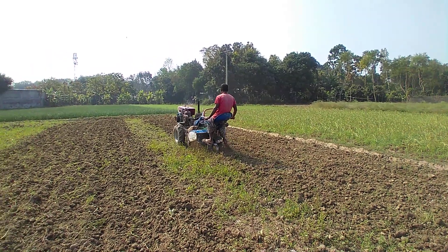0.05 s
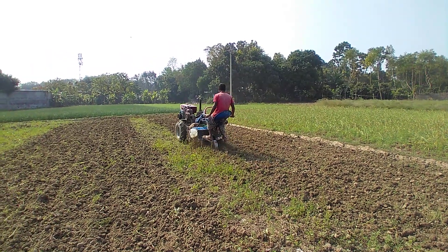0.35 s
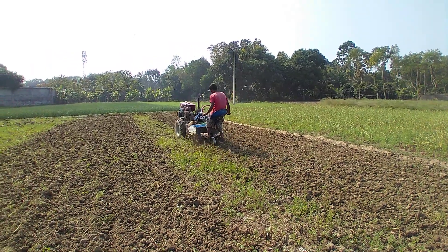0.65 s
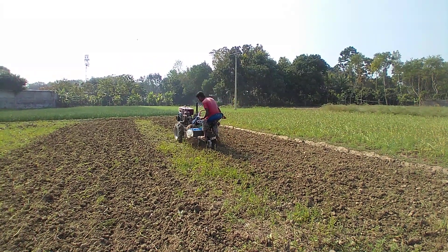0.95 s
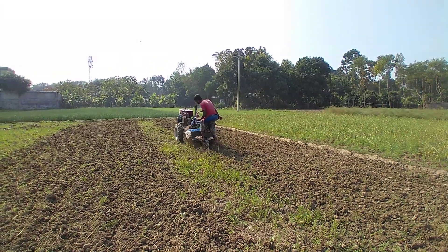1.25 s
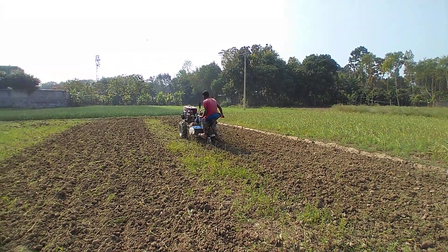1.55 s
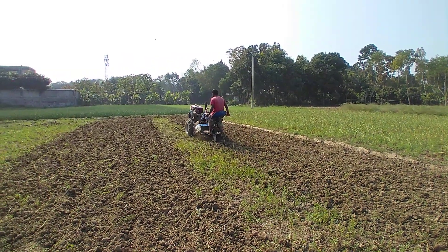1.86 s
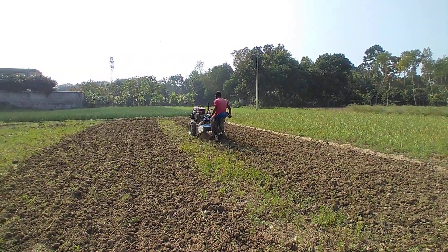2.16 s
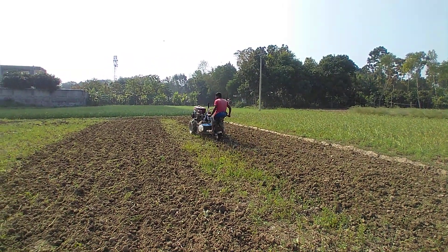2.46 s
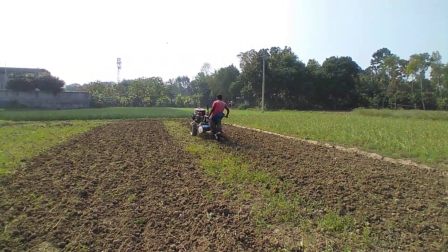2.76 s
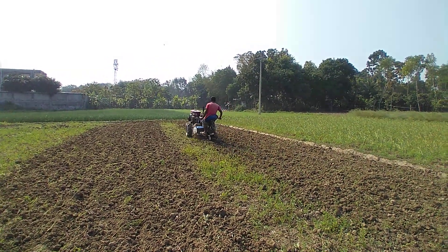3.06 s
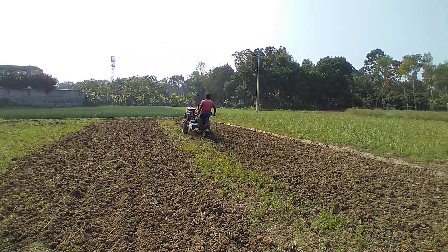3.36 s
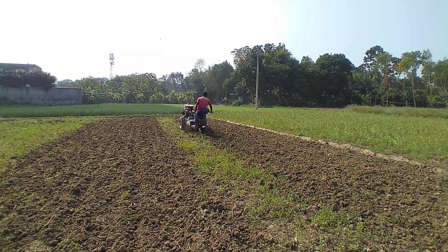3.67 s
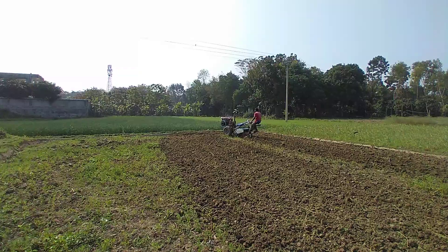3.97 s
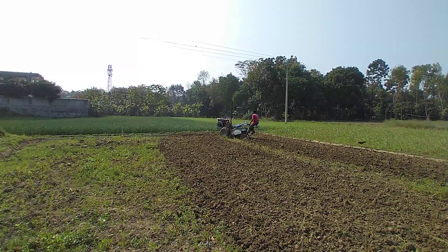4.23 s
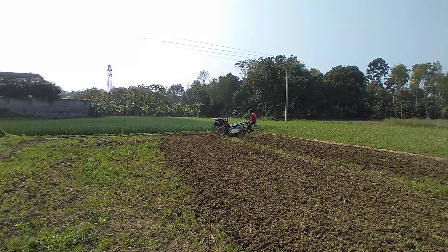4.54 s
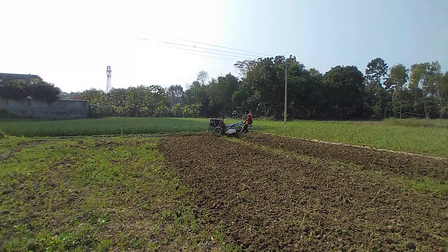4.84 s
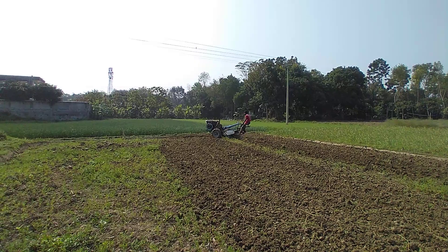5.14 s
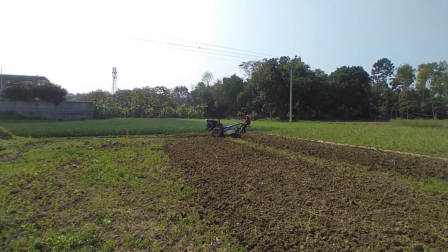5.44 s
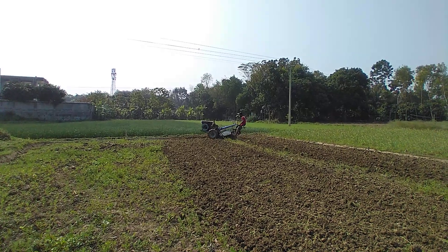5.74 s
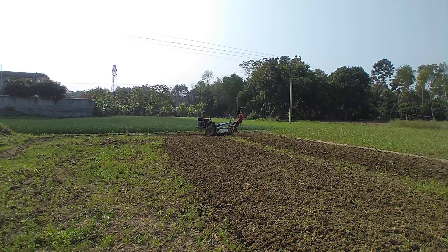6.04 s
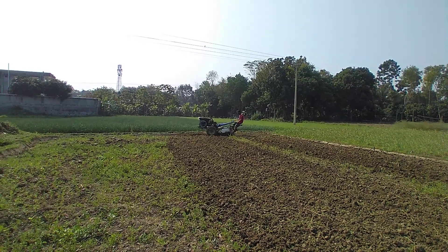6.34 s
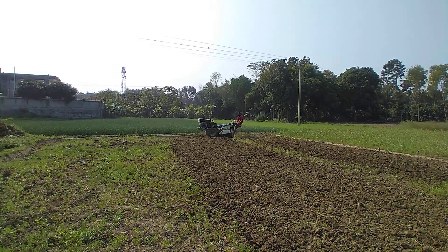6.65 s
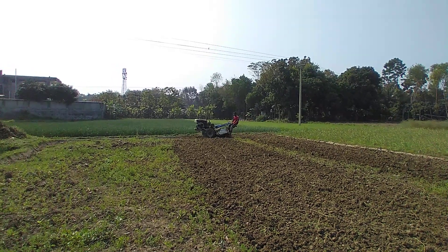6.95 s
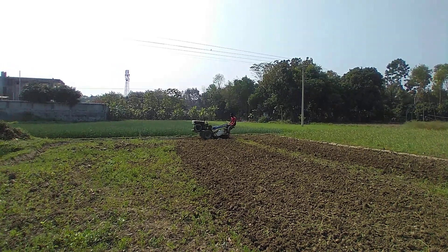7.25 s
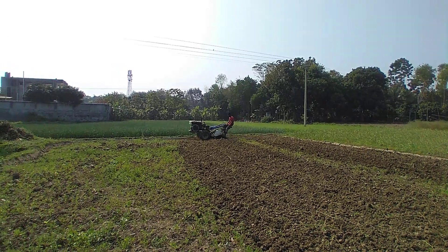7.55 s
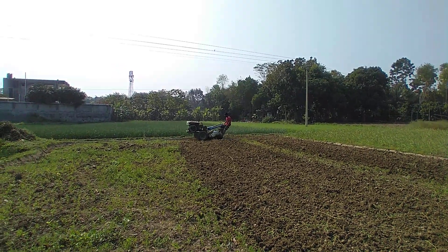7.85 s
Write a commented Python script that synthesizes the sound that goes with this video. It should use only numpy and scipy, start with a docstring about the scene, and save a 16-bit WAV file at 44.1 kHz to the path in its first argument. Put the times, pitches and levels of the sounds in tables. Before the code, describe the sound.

A single-cylinder diesel power tiller runs throughout in an open field, several metres from a stereo microphone. It fires evenly, about ten times a second, each low exhaust thump carrying a brief hissing whistle, over metallic engine knock and the chatter of gears and tines. For the first few seconds it grows slightly fainter and duller as it drives away. Wind rumbles on the microphone in gusts from about 0.4 to 1.3 seconds and again from 2.8 to 3.8. A faint, high clink of a tine comes at about 3.1 seconds and another at 5.1. At 3.8 seconds the engine's tone changes abruptly as it is heard from the side, and it continues at a steady distance, speeding up very slightly after 6 seconds. From about 7 seconds the strongest gust buffets the microphone, mostly on the right, easing by 8 seconds as the engine keeps chugging.

```python
"""An open field, a stereo microphone in a gusty breeze. At first a single-cylinder diesel power tiller is
heard from behind, 7.6 m off and driving away: each firing thumps through the silencer with a whistling
jet of gas, while combustion and valves knock the block over the chatter of gears and tines. At 3.1 s a
tine clinks in the soil. At 3.82 s the view jumps to the tiller's side, where it turns at a steady
distance. Near 7.2 s the strongest gust buffets the microphone, mostly its right port."""
import sys
import numpy as np
from scipy import signal
from scipy.fft import rfft, irfft
from scipy.io import wavfile
from scipy.ndimage import uniform_filter1d

SR = 44100
rng = np.random.default_rng(int(sys.argv[2]) if len(sys.argv) > 2 else 0)


def generate_wav(signal):
    """Clip the signal to [-1, 1] and save it as 16-bit WAV at the path in sys.argv[1]."""
    frames = np.transpose(np.atleast_2d(signal))
    scaled = np.clip(frames, -1, 1) * 32767
    pcm = np.round(scaled).astype(np.int16)
    wavfile.write(sys.argv[1], SR, pcm)


N = 357210
TIME = np.arange(N) / SR


def undb(db):
    """Decibels to gain."""
    return 10 ** (np.asarray(db) / 20)


def curve(table):
    """A table's (time, value) points joined by straight lines."""
    return np.interp(TIME, *np.transpose(table))


def butter(x, hz, kind, order=2):
    """Plain low-, high- or band-pass."""
    sos = signal.butter(order, np.clip(hz, 5, .45 * SR), kind, fs=SR, output="sos")
    return signal.sosfilt(sos, x + 1e-18)


def shelf(x, hz, low_db, high_db):
    """Separate gains below and above a frequency."""
    low = signal.sosfiltfilt(signal.butter(2, hz, fs=SR, output="sos"), x)
    return low * undb(low_db) + (x - low) * undb(high_db)


def walk(rate_hz):
    """Smooth random wander with a spread near 1."""
    step = int(SR / rate_hz)
    return 1.46 * uniform_filter1d(np.repeat(rng.standard_normal(N // step + 1), step), step)[:N]


def strike(times, sizes, response):
    """One scaled copy of a response at each time."""
    train = np.zeros(N)
    heard = (times >= 0) & (times < TIME[-1])
    np.add.at(train, (times[heard] * SR).astype(int), sizes[heard])
    return signal.oaconvolve(train, response)[:N]


def scatter(times, spread_db):
    """Random gains: no two firings are equally strong."""
    return undb(spread_db * rng.standard_normal(len(times)))


def turbulence(spread_hz=4200, own_db=3.0):
    """Noise at the microphone's two ports: alike in the bass, partly unrelated in the treble."""
    own = butter(rng.standard_normal((2, N)), spread_hz, "high", order=1)
    return rng.standard_normal(N) + undb(own_db) * own


# gusts crossing the field to the microphone (time [s], hold [s], relative level [dB])
FIELD_GUSTS = [(0.36, .04, -18.5), (0.538, .07, -14.5), (0.88, 0.15, -11), (1.202, 0.031, -13),
               (1.45, 0.31, -20.5), (2.76, 0.028, -15.5), (2.963, 0.083, -13.5), (3.233, 0.16, -11.5),
               (3.606, 0.17, -14.5), (5.045, .03, -23.5), (6.919, 0.085, -13.5), (7.2, .32, -9),
               (7.598, 0.4, -17)]

def wind_strength(attack_s=.052, release_s=.13, breeze_db=-29, wander_db=2.0):
    """Wind level in dB: each gust builds, holds and dies away over a light wandering breeze."""
    power = undb(breeze_db + wander_db * walk(4)) ** 2
    for start_s, hold_s, db in FIELD_GUSTS:
        before = np.maximum(start_s - TIME, 0) / attack_s
        after = np.maximum(TIME - start_s - hold_s, 0) / release_s
        power += undb(db) ** 2 * np.exp(-2 * np.minimum(before + after, 20))
    return 10 * np.log10(power)


# wind rumble right on the microphone (frequency [Hz], relative level [dB])
RUMBLE_SPECTRUM = [(6, -27), (20, 6), (65, -1), (105, -8), (165, -13), (230, -23.5), (330, -29),
                   (480, -36.5), (1000, -43), (16000, -115)]

def wind(gain_db=2.0, left_db=-14, eddy_db=3.1, bluster=.6, usual_db=-16):
    """Eddies rumble on each port separately, brighter in strong gusts; the left port is sheltered."""
    hz, db = np.transpose(RUMBLE_SPECTRUM)
    gust_db = wind_strength()
    colour = undb(np.interp(np.log(np.fft.rfftfreq(N, 1 / SR) + 1), np.log(hz), db))
    ports = np.array([irfft(rfft(rng.standard_normal(N)) * colour, N) * undb(eddy_db * walk(30))
                      for _ in range(2)])
    ports = shelf(ports / ports.std(), 130, 0, bluster * (gust_db - usual_db))
    return ports * undb(gust_db + gain_db + np.array([[left_db], [0]]))


# eddies that slap the microphone's right port (time [s], level [dB])
EDDY_SLAPS = [(3.27, -27), (3.62, -24), (7.194, -12.5), (7.23, -23), (7.41, -15), (7.598, -20.5)]

def buffets(swell_s=.0063, band_hz=(110, 330)):
    """Each eddy bursts on the right port with a short, rough flap."""
    times, db = np.transpose(EDDY_SLAPS)
    age = TIME[:SR // 6] / swell_s
    flap = butter(rng.standard_normal(N), band_hz, "band")
    bursts = strike(times, undb(db), age * np.exp(1 - age))
    return np.array([np.zeros(N), flap / flap.std() * bursts])


# tines hitting something hard in the soil, heard dead centre (time [s], pitch [Hz], level [dB])
TINE_HITS = [(3.125, 7200, -34), (5.103, 7550, -33)]

def clinks(t60_s=.071, beat_hz=170):
    """A struck tine rings briefly with a close pair of modes."""
    age = TIME[:SR // 8]
    envelope = 1000 ** (-age / t60_s) * (1 - np.exp(-age * 1000))
    out = 0
    for hit_s, hz, db in TINE_HITS:
        modes = np.sin(2 * np.pi * hz * age) + .5 * np.sin(2 * np.pi * (hz - beat_hz) * age)
        out = out + strike(np.array([hit_s]), undb([db]), envelope * modes)
    return out


# governed engine speed, from behind and from the side (time [s], firing rate [Hz])
REAR_SPEED = [(0.0, 10.454), (0.46, 10.562), (1.48, 10.417), (2.65, 10.465), (3.82, 10.58)]
SIDE_SPEED = [(3.82, 10.382), (4.5, 10.495), (4.71, 10.256), (5.76, 10.462), (5.97, 10.672), (7.24, 10.95),
              (8.1, 10.752)]

def firings(rate_hz, start_s):
    """Times of blowdown, one of them at start_s: the exhaust opens once in two turns of the crank."""
    cycles = np.cumsum(rate_hz) / SR
    cycles -= np.interp(start_s, TIME, cycles)
    return np.interp(np.arange(np.ceil(cycles[0]), cycles[-1]), cycles, TIME)


def chatter(fired, rattle_db, tines_db, contacts=60, slip_s=.0002466):
    """Gear teeth tick near the same crank angles in every cycle; chain and tines clatter at random."""
    cycle = np.arange(len(fired))
    times = np.interp(cycle[:, None] + rng.random(contacts), cycle, fired, right=-1)
    # backlash lets each contact creep from cycle to cycle
    times += slip_s * np.cumsum(rng.standard_normal(times.shape), axis=0)
    sizes = rng.choice([-1, 1], contacts) * undb(3.3 * rng.standard_normal(times.shape))
    teeth = butter(strike(times.ravel(), sizes.ravel(), np.ones(1)), 1380, "low")
    tines = turbulence() * undb(1.02 * walk(220) + .45 * walk(14))
    return undb(rattle_db) * teeth + undb(tines_db) * tines


# combustion knock, piston slap, valves lifting and seating, from behind and from the side
# (time after blowdown [ms], centre [Hz], width [Hz], relative level [dB])
REAR_IMPACTS = [(-15, 1220, 260, 30), (-9, 830, 150, 34.5), (4.5, 640, 300, 26.5), (32.5, 630, 360, 31),
                (59, 600, 120, 24.5)]
SIDE_IMPACTS = [(-18, 1380, 107, 35.8), (-14.5, 785, 130, 34.5), (2.5, 1510, 860, 29.2),
                (28, 1170, 260, 30.3), (32, 647, 220, 32.8), (60.5, 770, 180, 17)]

def knocks(fired, impacts, spread_db=2.3, play_s=.00008):
    """Metal meets metal at set points of the cycle; softer contacts sound lower."""
    out = 0
    for delay_ms, hz, width_hz, db in impacts:
        contact = butter(signal.unit_impulse(1024), [hz - width_hz / 2, hz + width_hz / 2], "band", 1)
        times = fired + delay_ms / 1000 + play_s * rng.standard_normal(len(fired))
        out = out + undb(db) * strike(times, scatter(fired, spread_db), contact)
    return out


# firings whose jet whistles hardest at the outlet (time [s], pitch [Hz], relative level [dB])
HARD_FIRINGS = [(0.112, 3610, -26), (0.208, 3660, -20), (0.303, 3680, -17.5), (1.638, 3170, -27),
                (1.734, 3560, -22), (1.83, 3540, -25), (2.499, 3080, -24.5), (2.786, 3940, -24.5),
                (3.892, 3540, -23), (5.047, 3790, -23), (5.145, 3660, -23), (5.53, 3750, -24),
                (5.818, 3930, -24.5), (6.099, 3420, -23), (6.657, 3400, -24), (7.116, 3470, -23)]

def whistle(fired, upper_db, usual_hz=3550, usual_db=-29, gain_db=4, delay_s=.002, swell_s=.0021,
            sag=.014, rough=.013, upper_ratio=1.42):
    """The jet sings briefly on two modes of the outlet, sinking in pitch as the gas cools."""
    out = np.zeros(N + SR)
    age = TIME[:SR // 25] / swell_s
    heat = np.exp(-age / 2)
    for fired_s in fired:
        hz = usual_hz * (1 + .032 * rng.standard_normal())
        db = usual_db + 2 * rng.standard_normal()
        for hard_s, hard_hz, hard_db in HARD_FIRINGS:
            if abs(hard_s - fired_s) < .02:
                hz, db = hard_hz, hard_db
        flutter = 5 * uniform_filter1d(rng.standard_normal(len(age)), size=25)
        phase = 2 * np.pi * np.cumsum(hz * (1 + sag * (heat - .5) + rough * flutter)) / SR
        tone = np.sin(phase) + undb(upper_db) * heat * np.sin(upper_ratio * phase)
        start = int((fired_s + delay_s) * SR)
        out[start:start + len(age)] += undb(db + gain_db) * age * np.exp(1 - age) * tone
    return out[:N]


# gas rushing through exhaust, intake and closing valve, from behind and from the side
# (time after blowdown [ms], swell [ms], low cut [Hz], relative level [dB])
REAR_PUFFS = [(1.48, 4.73, 1590, 9), (23.8, 2.7, 1800, 3), (56.4, 1.9, 11500, 16.5)]
SIDE_PUFFS = [(2.13, 3.4, 2870, 11.75), (23.9, 4.1, 700, 2.4), (52.9, 2.7, 9300, 11)]

def gas(fired, puffs, jet_db, spread_db=1.5, hard_db=1.0):
    """Turbulent puffs swell and die as each valve passes gas; hard firings give a louder exhaust jet."""
    hard = np.abs(fired[:, None] - np.array(HARD_FIRINGS)[:, 0]).min(axis=1) < .02
    out = 0
    for row, (delay_ms, swell_ms, low_hz, db) in enumerate(puffs):
        is_exhaust = row == 0
        age = TIME[:SR // 16] * 1000 / swell_ms
        sizes = scatter(fired, spread_db) * undb(hard_db * hard * is_exhaust)
        flow = strike(fired + delay_ms / 1000, sizes, age * np.exp(1 - age))
        out = out + undb(db + jet_db * is_exhaust) * flow * butter(turbulence(), low_hz, "high")
    return out


# resonances of block, covers and silencer shell, from behind and from the side
# (centre [Hz], width [Hz], relative level [dB])
REAR_MODES = [(201, 130, -11.5), (336, 69, -15.5), (509, 20, -17), (611, 62, -13), (770, 154, -16),
              (1134, 194, -21), (1470, 370, -21), (1997, 250, -24.5), (2406, 240, -27), (2930, 330, -23.5),
              (3760, 1000, -27.5), (4190, 870, -34), (7100, 2420, -37.5), (8960, 750, -37.5)]
SIDE_MODES = [(201, 97, -18.5), (353, 91, -30.5), (520, 52, -18), (614, 67, -15.5), (754, 175, -19),
              (1070, 130, -23.5), (1384, 257, -18.5), (1850, 220, -21), (2328, 110, -28),
              (2864, 510, -27.5), (3630, 1070, -31.5), (4100, 1530, -32.5), (7160, 2300, -44),
              (9030, 1020, -42.5)]

def engine_body(drive, modes, size=8192):
    """The metalwork rings as a bank of steep-sided resonances."""
    f = np.arange(size // 2 + 1) * SR / size + 1
    power = sum(undb(2 * db) / (1 + ((f / hz - hz / f) * hz / width) ** 2 / 2) ** 2
                for hz, width, db in modes)
    # minimum phase: the ringing follows the blow
    cepstrum = irfft(np.log(power + 1e-14) / 2)
    cepstrum[1:size // 2] *= 2
    cepstrum[size // 2 + 1:] = 0
    response = irfft(np.exp(rfft(cepstrum)))[:size // 2]
    return signal.oaconvolve(drive, response)[:N]


# pipe modes rung by blowdown, the suction after it and the intake gulp, from behind and from the side
# (time after blowdown [ms], pitch [Hz], t60 [ms], signed pressure [relative])
REAR_PIPE_MODES = [(0.099, 138.7, 69, 0.41), (1.19, 107, 85, 0.45), (5.57, 75, 96, -0.33),
                   (25.2, 105.5, 210, -0.13)]
SIDE_PIPE_MODES = [(0.204, 151, 64, 0.36), (1.35, 105.8, 69, 0.43), (3.58, 71, 52, -0.44),
                   (24.1, 106.5, 300, -0.084)]

def thump(fired, pipes, opening_ms=1.98, spread_db=.5):
    """Each slug of gas rings the pipes; the valve takes a moment to open."""
    response = 0
    for delay_ms, hz, t60_ms, pressure in pipes:
        age_ms = np.maximum(TIME[:SR // 4] * 1000 - delay_ms, 0)
        ring = np.sin(2 * np.pi * hz * age_ms / 1000) * 1000 ** (-age_ms / t60_ms)
        opening = 1 - np.exp(-(age_ms / opening_ms) ** 2)
        response = response + pressure * ring * opening
    return strike(fired, scatter(fired, spread_db), response)


# the microphone's left port against its right (frequency [Hz], level [dB])
LEFT_OVER_RIGHT = [(100, 4), (250, 0.5), (600, 0.3), (1290, -2), (2400, -3.5), (4400, -0.6), (8100, 2),
                   (15000, 5.5)]

def two_ports(x, lead_s, twist_rad=.92, twist_hz=1520, twist_width_hz=330):
    """The right port hears the tiller first; the left is brighter on top and lags more in one mid band."""
    f = np.fft.rfftfreq(N, 1 / SR)
    hz, db = np.transpose(LEFT_OVER_RIGHT)
    tilt = undb(np.interp(np.log(f + 1), np.log(hz), db) / 2)
    lag = 2 * np.pi * f * lead_s + twist_rad * np.exp(-((f - twist_hz) / twist_width_hz) ** 2)
    return irfft(rfft(x) * np.array([tilt * np.exp(-1j * lag), 1 / tilt]), N)


def tiller(speed, pipes, impacts, puffs, modes, start_s, away_m_s, facing_db, level_db, jet_db,
           rattle_db, tines_db, upper_db, sheen_db, lead_s, boom_db, left_boom_db, left_cut_hz):
    """The machine from one spot: louder with speed, fainter and duller with distance, coloured by facing."""
    usual_rate_hz, effort_db_per_hz = 10.5, .5
    start_distance_m, dulling_db_per_m = 7.6, 1.4
    rate_hz = curve(speed)
    fired = firings(rate_hz, start_s)
    gone_m = away_m_s * TIME
    effort_db = effort_db_per_hz * (rate_hz - usual_rate_hz)
    gain = undb(level_db + effort_db) / (1 + gone_m / start_distance_m)
    blows = knocks(fired, impacts) + chatter(fired, rattle_db, tines_db)
    blows = shelf(blows, 850, .7 * facing_db, -.36 * facing_db)  # casing below, head above
    drive = blows + gas(fired, puffs, jet_db)
    clatter = gain * np.array([engine_body(port, modes) for port in drive]) + whistle(fired, upper_db)
    # the highest treble falls away steeply
    top_db = sheen_db + 2.3 * facing_db - dulling_db_per_m * gone_m
    clatter = shelf(butter(clatter, 10800, "low", order=4), 9700, 0, top_db)
    boom = gain * thump(fired, pipes) * undb(boom_db)
    # the left port passes less bass
    left_boom = undb(left_boom_db) * butter(boom, left_cut_hz, "high", order=1)
    return np.array([left_boom, boom]) + two_ports(clatter, lead_s)


# turning, the tiller shows the microphone its booming casing and hissing outlet (+) or ringing head (-)
# (time [s], tone tilt [dB])
SIDE_FACING = [(3.82, 2.5), (4.6, 3.5), (5.6, -0.6), (6.3, -0.4), (7.6, 0)]

def scene(change_s=3.82):
    """The microphone stands behind the tiller, then abruptly at its side, in a gusty breeze."""
    rear = tiller(REAR_SPEED, REAR_PIPE_MODES, REAR_IMPACTS, REAR_PUFFS, REAR_MODES,
                  start_s=.0169, away_m_s=1.095, facing_db=0, level_db=2.08,
                  jet_db=-.64, rattle_db=13.5, tines_db=-1.27, upper_db=-29, sheen_db=6.5,
                  lead_s=.000055, boom_db=2.2, left_boom_db=-1.5, left_cut_hz=37)
    side = tiller(SIDE_SPEED, SIDE_PIPE_MODES, SIDE_IMPACTS, SIDE_PUFFS, SIDE_MODES,
                  start_s=3.8918, away_m_s=0, facing_db=curve(SIDE_FACING), level_db=-.38,
                  jet_db=0, rattle_db=11.4, tines_db=-1.2, upper_db=-5, sheen_db=-4.5,
                  lead_s=.000002, boom_db=1.7, left_boom_db=-2, left_cut_hz=31)
    return np.where(TIME < change_s, rear, side) + clinks() + wind() + buffets()


def record(dry, top_hz=15800):
    """The strongest gusts overload the recorder, which also cuts the highest treble."""
    return signal.sosfilt(signal.ellip(8, .2, 70, top_hz, fs=SR, output="sos"), np.clip(dry, -1, 1))


dry = scene()
out = record(dry)
generate_wav(out)
```